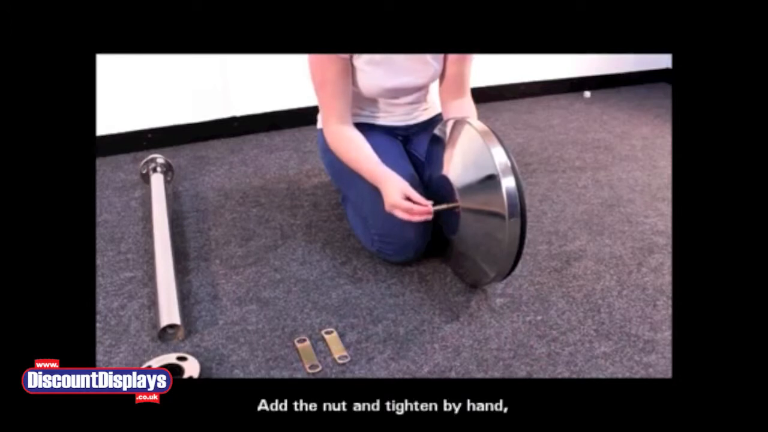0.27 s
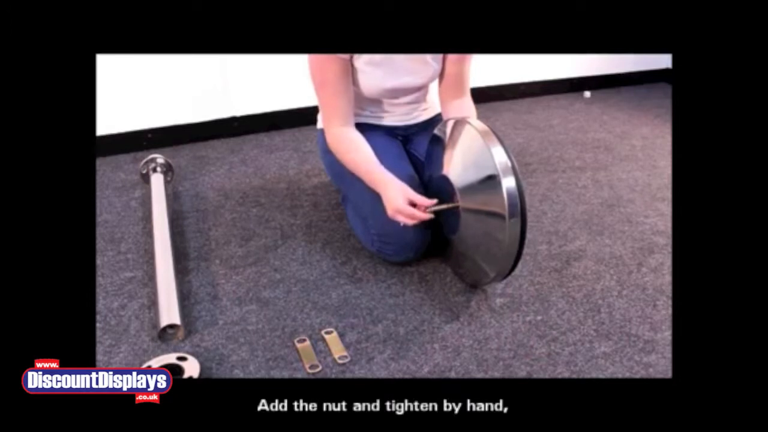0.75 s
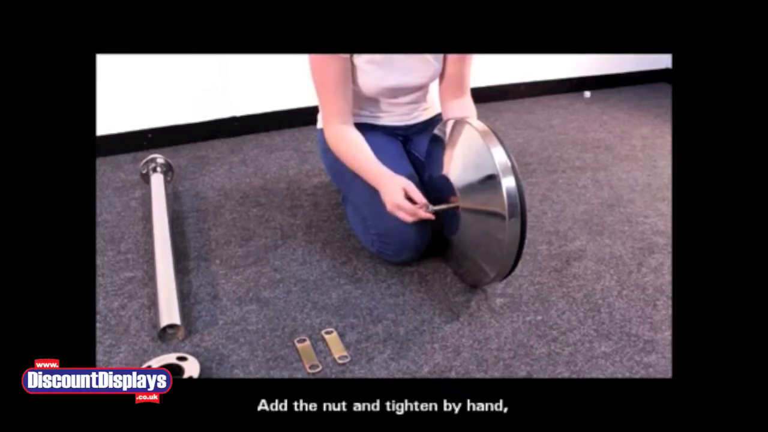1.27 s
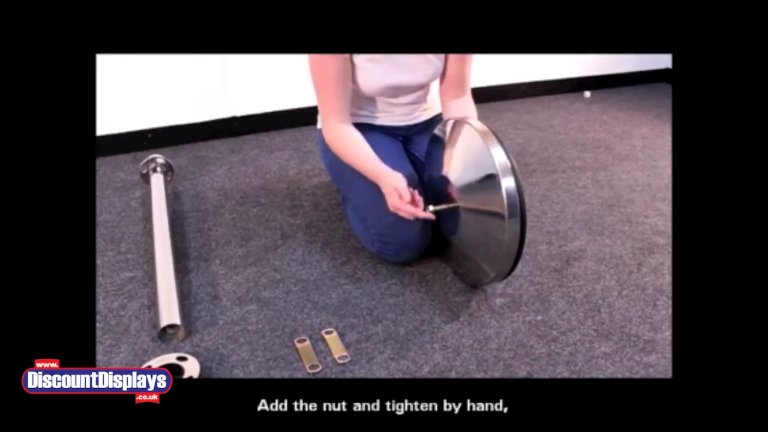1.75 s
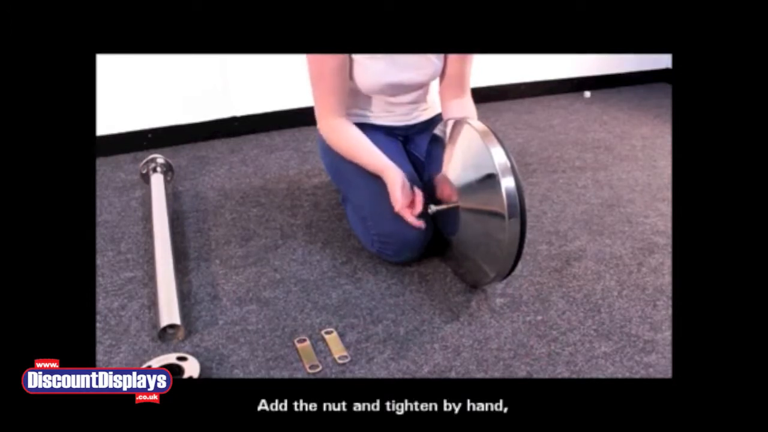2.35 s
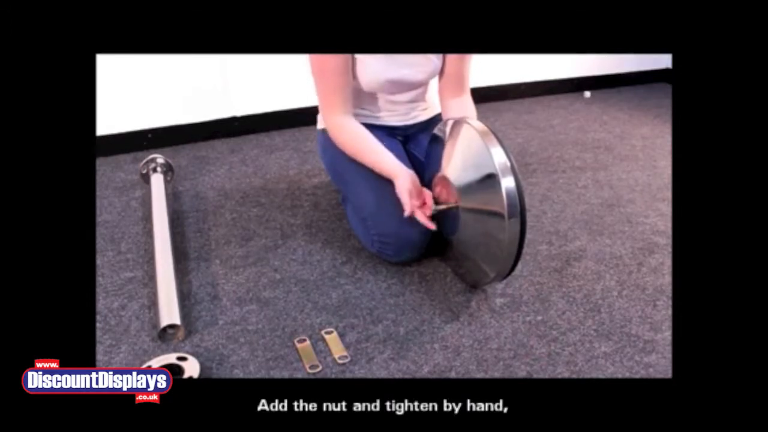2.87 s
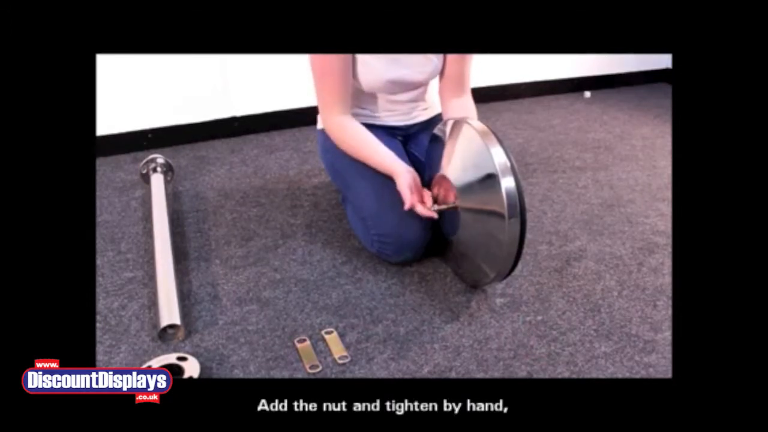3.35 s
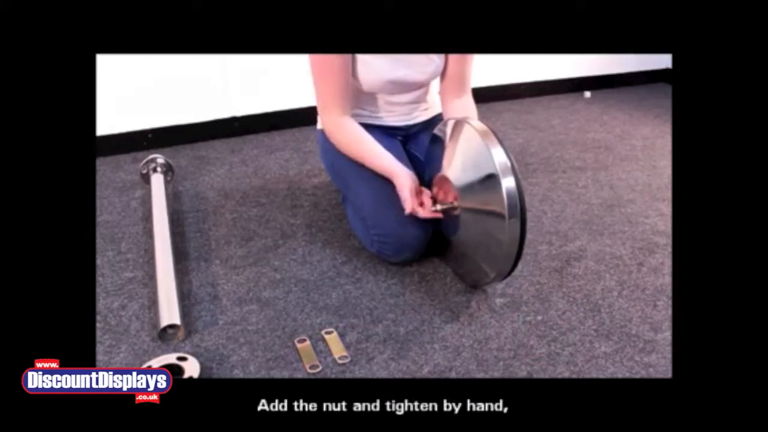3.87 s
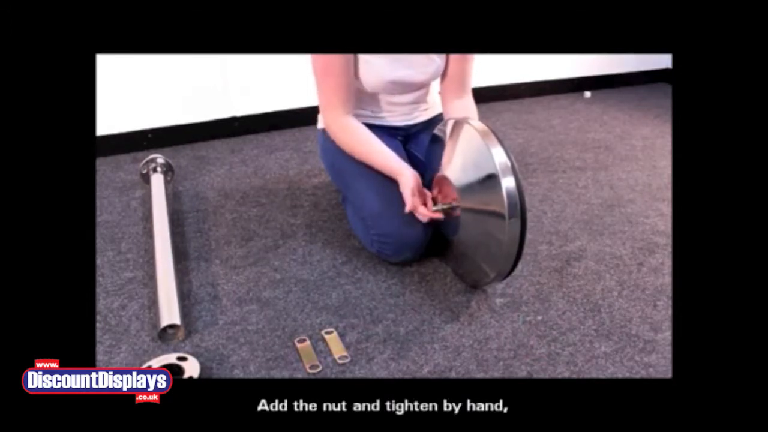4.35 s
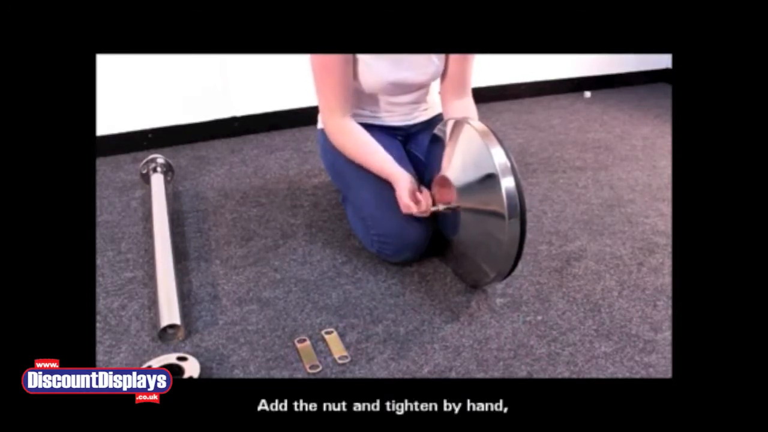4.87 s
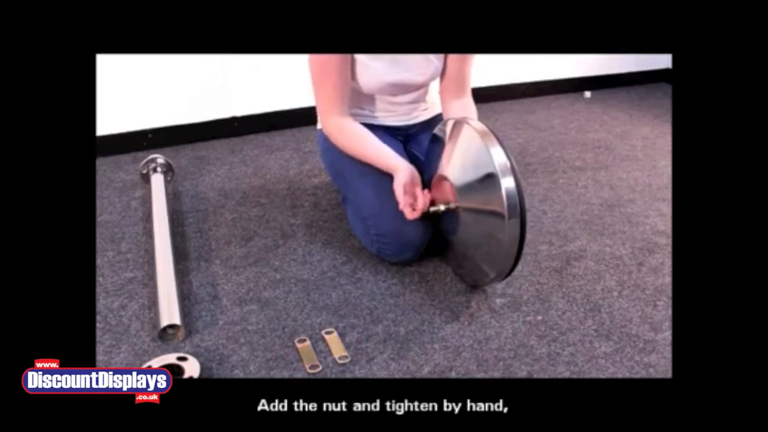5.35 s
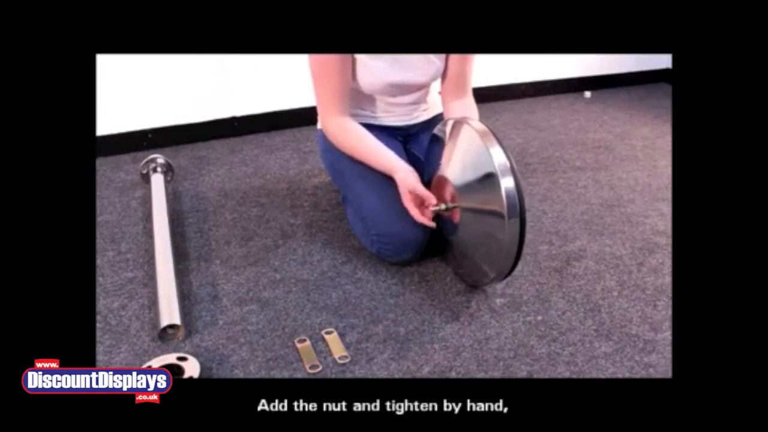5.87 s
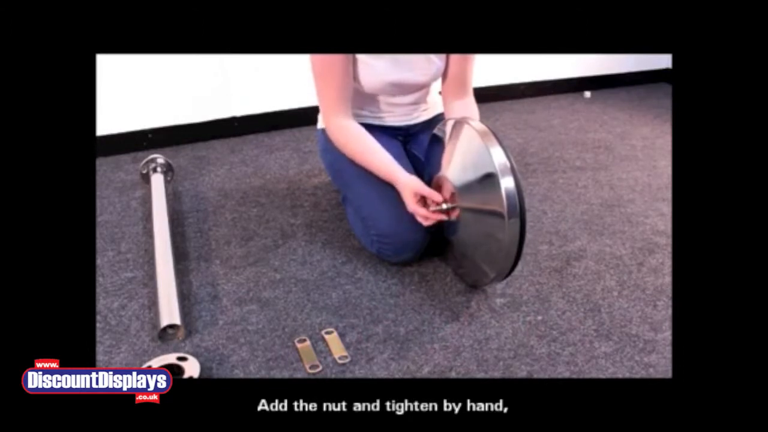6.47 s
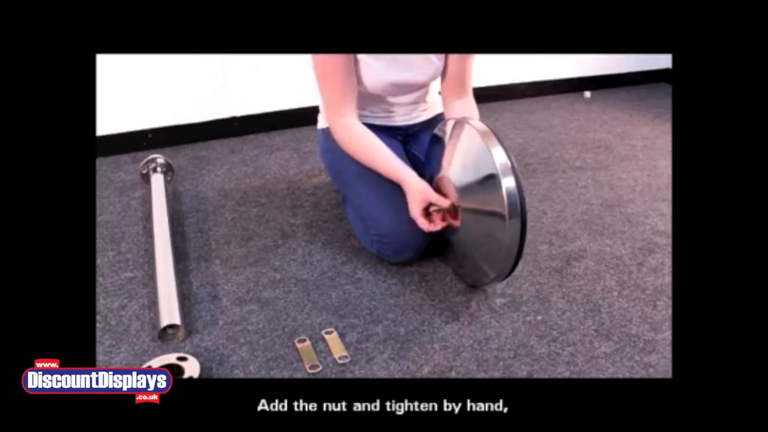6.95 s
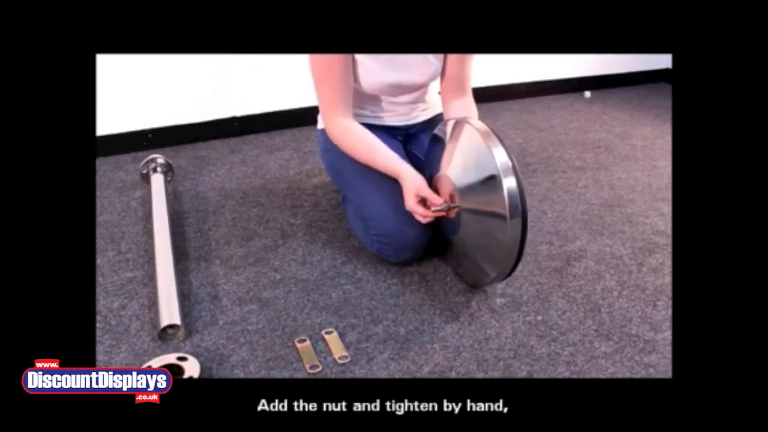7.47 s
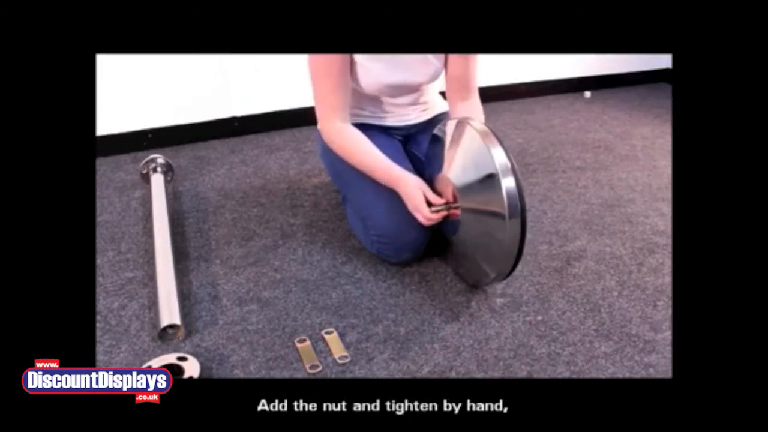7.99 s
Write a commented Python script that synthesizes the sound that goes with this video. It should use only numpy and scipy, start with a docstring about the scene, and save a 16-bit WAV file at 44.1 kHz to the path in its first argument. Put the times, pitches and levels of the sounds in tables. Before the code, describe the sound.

Close metallic taps, scrapes and twelve short rattling spins of a loose steel nut on a bolt, over steady ventilation hum in a carpeted room.

```python
"""Close in mono on a steel nut on a bolt through a hollow steel base disc, in a carpeted room.
Ventilation, filtered noise with fan tones, hums throughout. At first the nut only knocks and scrapes.
From 1.4 s come twelve flicks: a finger taps the nut, grips it and slips off, and the nut coasts, rattling
in its loose thread. Contact forces ring modes of bolt and disc; soft sine thuds are the disc on carpet.
After the last flick at 6.2 s the nut's turns are slow and quiet."""
import sys
import numpy as np
from scipy import signal
from scipy.fft import rfft, irfft
from scipy.io import wavfile
from scipy.ndimage import uniform_filter1d

SR = 44100
rng = np.random.default_rng(int(sys.argv[2]) if len(sys.argv) > 2 else 0)


def wav_out(sig):
    """Save sig, one row per channel (or a flat mono array), as 16-bit PCM at SR to the path in sys.argv[1]."""
    wavfile.write(sys.argv[1], SR, np.round(np.clip(np.atleast_2d(sig).T, -1, 1) * 32767).astype(np.int16))


N = 362502
TIME = np.arange(N) / SR
CLOCK = np.arange(0, N / SR + .001, .001)   # slow clock for level curves, t/s

# ventilation rush, relative spectrum: f/Hz, level/dB
AIR_SPECTRUM = [(15, -42.5), (25, -5), (103, -7), (166, -12.5), (230, -9.5), (268, -12.5), (345, -8.5),
                (372, -9.5), (455, -9.5), (491, -22.5), (543, -12), (834, -18.5), (995, -19), (1100, -20.5),
                (10400, -36), (13500, -95), (22000, -120)]
# fan tones: f/Hz, mean peak level/dB
FAN_TONES = [(100, -69), (302, -64.5), (349, -61), (399, -70), (453, -69)]
# single knocks of nut on thread: t/s, relative level/dB, then shares/dB: dull, bright, top
NUT_KNOCKS = [(0.0534, -24.5, -12.5, -11.5, -49), (0.3151, -22.5, -4, -2, -22.5),
              (0.5307, -52, -1, -17, -28), (0.5756, -34.5, -1, -7.5, -30), (0.7602, -34, -8, -21, -32),
              (0.8674, -36, 3, -4, -28), (0.967, -31.5, 0, 4.5, -13), (1.1328, -32.5, -6.5, -12, -34),
              (1.3315, -31, -6, -22, -36), (3.1836, -16.5, -22, -26, -29), (3.983, -15, -14, -16, -26),
              (5.3202, -15, -22, -14, -21), (6.1328, -44.5, 2, -3, -27), (6.6036, -32.5, -22, -10, -34),
              (6.8249, -31, 0.5, -7.5, -15), (7.659, -49.5, 0, -7, -17), (7.7397, -37.5, -2, -10, -15),
              (7.8483, -47.5, -2, 9, 2), (8.0293, -50, -8, -7, -16), (8.182, -47.5, -6, -1, -24)]
# modes of the disc with its bolt: f/Hz, undamped width/Hz, relative level/dB
DISC_MODES = [(493.8, 11, -14.5), (689, 9.6, -6), (743, 28, -8.5), (802, 6.2, -11.5), (883, 22, -7),
              (984, 25, -7.5), (1085, 38, -13), (1310.5, 38, -7.5), (1446, 38, -11), (1560, 48, -2),
              (1664, 19, 3), (1891, 50, -3.5), (2066, 67, 0), (2344, 81, -3.5), (2404, 46, -29.5),
              (2524, 44, 0.5), (3002, 56, -4), (3172, 23.5, -3.5), (3497, 21.6, -1), (3790, 43, -10),
              (3880, 14, -0.5), (4196, 37, -17.5), (4000, 22, -35), (4670, 230, -7.5), (4790, 36, -14.5),
              (5066, 15, -4), (5185, 51, -11.5), (5420, 49, -11), (8700, 45, -20.5), (9840, 130, -20.5)]
# crowd of weaker modes between them: f/Hz, relative level/dB
WEAK_MODES = [(150, -47), (300, -33), (520, -20), (800, -17), (1800, -26.5), (2450, -22.5), (2800, -47),
              (3400, -14), (4600, -14.5), (5400, -49.5), (5800, -30), (8300, -33.5), (9200, -28),
              (10500, -75)]
# round trips of bending waves across the disc: t/s
BENDING_TRIPS = [.00029, .00067, .00121, .00263]
# borders of the registers body, rub, ring, bright and top: f/Hz
REGISTER_EDGES = [1020, 1480, 2810, 5750]
# ring time of the room: f/Hz, t60/s
ROOM_DECAY = [(300, 0.64), (800, 0.35), (2000, 0.29), (5000, 0.31), (10000, 0.17)]
# the sliding nut makes the bolt sing: t/s, length/s, relative levels/dB of lower and upper mode,
#   fading of the lower mode/(dB per s)
BOLT_SINGING = [(0.054, .06, -59, -33.5, 222), (0.535, .04, -49.5, -76, 80), (1.92, 0.09, -37, -33.5, 99),
                (2.248, .2, -43.5, -34.5, 32), (2.547, .02, -62, -34, 248),
                (2.649, 0.13, -31.5, -32.5, 118), (3.065, 0.22, -37.5, -31, 51),
                (3.515, 0.068, -52, -36, 9), (3.609, 0.41, -36, -27.5, 106), (4.027, .07, -53, -20.5, 200),
                (4.441, 0.0145, -60, -27.5, 250), (4.512, .04, -57, -27, 300), (4.894, .08, -52, -39, 159),
                (5.339, .07, -63, -23, 240), (5.692, .3, -41.5, -62, 2), (6.142, .025, -51, -68, 100)]
# the two singing modes: f/Hz, width/Hz
SINGING_MODES = [(1684, 12), (2535, 55)]
# the nut scrapes along the thread, turned slowly or catching as it coasts: t/s, length/s,
#   relative level/dB, then shares/dB: body, rub, bright, top
THREAD_SCRAPES = [ (0.093, 0.072, -43.5, -10, -2, -12, -35), (0.180, 0.05, -55.5, 6.5, 2.5, -12, -25),
                  (0.529, 0.0083, -51.5, 3, 7.5, -12, -24), (0.573, 0.018, -54, -5, 3.5, -13, -28),
                  (0.638, 0.047, -63, 11.5, 13, -6, -20), (0.731, 0.064, -59, 7, 13.5, -6, -20),
                  (0.818, .07, -52, 0.5, 6, -10, -22), (0.967, 0.014, -48, 5, 1, 1, -29),
                  (1.15, 0.022, -57, 0, 3, -7, -22), (1.191, 0.036, -61, 3, 11.5, -3, -20),
                  (1.323, 0.02, -46.5, 0.5, 9.5, -5.5, -31), (1.35, 0.026, -63.5, 14, -1, -11, -20),
                  (2.267, 0.014, -37.5, -1, -1, -1.5, -16), (2.375, 0.0091, -44, -13, -10, -5.5, -21),
                  (3.595, 0.031, -33.5, -18, -15, -4, -18), (4.929, 0.014, -32.5, -8, -14, -14, -21),
                  (5.861, 0.015, -34.5, -6.5, -8, -6.5, -26), (5.928, 0.011, -36, 0.5, -6, -3.5, -17),
                  (6.606, .022, -51.5, -0.5, -3, -12, -30), (6.742, 0.053, -49, -8, -1.5, -15, -30),
                  (6.81, 0.058, -46.5, 4, 0.5, -12, -28), (7.003, 0.088, -61.5, 3.5, 0, -4.5, -20),
                  (7.115, 0.13, -67.5, 4, 2.5, -7, -14), (7.744, 0.077, -60, 7.5, -19, -7, -13),
                  (7.84, 0.007, -60, 11, 6, -2, -6)]
# soft bumps of the disc on the carpet: t/s, relative level/dB, mean f/Hz, Gaussian spread/s
CARPET_BUMPS = [(0.942, -48.5, 98.6, 0.023), (2.382, -51, 108, 0.015), (2.483, -47, 105, 0.089),
                (5.575, -39.5, 105, 0.025), (5.697, -51.5, 94.9, 0.083), (6.047, -48, 96.2, 0.043),
                (6.407, -49, 59, 0.015), (6.515, -52.5, 74.7, 0.048)]
# finger flicks that spin the nut: touch t/s, slip-off t/s, coast length/s, then relative levels/dB:
#   tap, fingernail edge of the tap, grip, roll, snap, spin-up; then spin-up rise/s, brightness/dB,
#   coast level/dB, slowing/(dB per s; below zero the level grows)
FINGER_FLICKS = [ (1.444, 1.571, 0.039, -37, -10, -49, -40, -29, -31, 0.047, -2.5, -43.5, 62),
                 (1.824, 1.888, 0.13, -34.5, 7, -42.5, -33.5, -24, -36, 0.051, 6.5, -31, 81),
                 (2.18, 2.244, 0.21, -22.5, 8, -37.5, -35, -15.5, -37, 0.032, 3, -39.5, -6),
                 (2.545, 2.646, 0.095, -15.5, 0.5, -44.5, -26, -36, -26, 0.058, 0.5, -35, 24),
                 (3.004, 3.072, 0.26, -15.5, 11.5, -36, -27.5, -14, -25.5, 0.026, -1.5, -32.5, 47),
                 (3.453, 3.51, 0.23, -35.5, -8, -52, -28.5, -19, -30, 0.036, -1, -36, 6),
                 (3.927, 4.029, 0.021, -31, -7, -47, -26, -40, -22.5, 0.062, 1, -38, 118),
                 (4.434, 4.5, 0.016, -16.5, 3.5, -38.5, -31, -10, -22, 0.013, 1, -23.5, 100),
                 (4.846, 4.898, 0.14, -24.5, 5.5, -43.5, -31.5, -14, -30.5, 0.044, -3.5, -31, 118),
                 (5.247, 5.337, 0.022, -16, 13.5, -40, -33, -13, -20, 0.014, 1.5, -34, 100),
                 (5.659, 5.74, 0.24, -16.5, 10.5, -40.5, -36, -12, -30.5, 0.0096, 1.5, -38.5, 19),
                 (6.211, 6.299, 0.045, -34, -11, -39, -39, -25, -38, 0.087, -1, -42.5, 80), ]
# colour of each phase of a flick against its ring level: body/dB, rub/dB, bright/dB, top/dB
TAP_SHARES = (-8.5, -7.5, -7.5, -21)
GRIP_SHARES = (-3.5, -0.5, -9.5, -17.5)
SPIN_SHARES = (-6.5, -19.5, -5.5, -16)
COAST_SHARES = (-1.5, -7.5, -9, -20)
SNAP_SHARES = (-12, -9, -15.5, -26)
# heavy jolts that shake the whole disc: t/s, relative level/dB, centre of the push f/Hz
DISC_JOLTS = [(4.031, -32, 550), (4.504, -34, 486), (5.34, -31.5, 363), (5.347, -34, 675)]
# deep modes of the disc: f/Hz, relative level/dB, t60/s
DEEP_DISC_MODES = [(328, -2, 0.11), (372, 2, .11), (440, 4, 0.12), (500, -3.5, 0.3), (522, -6.5, 0.4),
                   (644, -5.5, 0.84)]

ATTACK_S, RELEASE_S = 0.0089, 0.047   # time in which a rattle rises or falls by 20 dB
BITE_DB, BITE_S = 2.5, 0.0053   # a scrape bites harder as it breaks loose
SCRAPE_RELEASE_S = 0.048   # time in which a scrape falls by 20 dB
ROLL_LEAD_S, ROLL_RISE_S = 0.011, 0.062   # the fingertip rolls over the nut just before it slips off
SPIN_UP_HOLD_S = 0.0084   # the nut keeps its top speed this long
SPIN_DOWN_S, SPIN_DOWN_SHARE = 0.013, 0.82   # the spin-up falls in this time plus a share of its rise
UPPER_FADES = 1.62   # how much faster the upper singing mode fades


def from_db(db):
    """Decibels to gain."""
    return 10 ** (np.asarray(db) / 20)


def unit_energy(x):
    """Scale so that the squares sum to one."""
    return x / np.sqrt(np.sum(x ** 2) + 1e-20)


def at_hz(points, hz):
    """Read a table on a log-frequency axis."""
    f, value = np.transpose(points)
    return np.interp(np.log(np.maximum(hz, 1)), np.log(f), value)


def at_samples(curve):
    """Read a curve of the slow clock at every sample."""
    return np.interp(TIME, CLOCK, curve)


def cut(x, hz, kind, order=4):
    """Causal Butterworth filter."""
    return signal.sosfilt(signal.butter(order, hz, kind, fs=SR, output="sos"), x)


def drift(per_s):
    """Random wander about zero: normal values joined by straight lines, per_s of them a second."""
    knots = rng.standard_normal(N // 20)
    return np.interp(TIME * per_s, np.arange(len(knots)), knots)


def coloured(spectrum, size):
    """Noise of rms 1 with the given spectrum and random phases."""
    hz = np.fft.rfftfreq(size, 1 / SR)
    phases = np.exp(2j * np.pi * rng.random(len(hz)))
    noise = irfft(from_db(at_hz(spectrum, hz)) * phases, size)
    return unit_energy(noise) * np.sqrt(size)


def ventilation(air_db=-56, unsteady=0.4, lowest_hz=34):
    """Steady rush behind the disc, with fan tones that waver in phase and strength."""
    tones = np.zeros(N)
    for hz, db in FAN_TONES:
        tone = np.sin(2 * np.pi * hz * TIME + unsteady * drift(23))
        tones += from_db(db) * tone * (1 + unsteady * drift(12))
    rush = from_db(air_db) * coloured(AIR_SPECTRUM, size=N)
    return cut(rush, lowest_hz, "high", order=1) + tones


def knocks(level_db=13.5, bounce=0.41, bounce_s=.0045):
    """Forces of single knocks and of each flick's tap and snap, each with two fading rebounds."""
    blows = [(s, db, (dull, dull, bright, top)) for s, db, dull, bright, top in NUT_KNOCKS]
    for touch, slip, _, tap_db, nail_db, _, _, snap_db, *_ in FINGER_FLICKS:
        blows.append((touch, tap_db, np.add(TAP_SHARES, [0, 0, 0, nail_db])))
        blows.append((slip, snap_db, SNAP_SHARES))
    force = np.zeros((5, N))
    all_gaps = rng.uniform(0.54, 1.1, (len(blows), 2))
    for (s, db, (body, rub, bright, top)), gaps in zip(blows, all_gaps):
        blow = from_db(db + level_db + np.array([body, rub, 0, bright, top]))
        for k, delay in enumerate([0, *np.cumsum(gaps * bounce_s)]):
            force[:, min(round((s + delay) * SR), N - 1)] += bounce ** k * blow
    return force


def disc_response(damping=0.97, reflection=0.71):
    """Ring of the steel after one contact: strong modes over weak ones, smeared by trips across the disc."""
    size = SR // 2
    hz = np.fft.rfftfreq(size, 1 / SR)
    power = from_db(at_hz(WEAK_MODES, hz)) ** 2
    for centre, width, db in DISC_MODES:
        detuning = 2 * (hz - centre) / (width * damping)
        resonance = from_db(db) ** 2 / (1 + detuning ** 2)
        power = power + resonance / (1 + (detuning / 10) ** 2)   # far skirts of neighbours cancel
    cepstrum = irfft(np.log(power) / 2, size)
    spectrum = np.exp(rfft(2 * cepstrum[:size // 2], size))   # minimum phase: nothing sounds before the contact
    for trip in BENDING_TRIPS:
        delay = np.exp(-2j * np.pi * hz * round(trip * SR) / SR)
        spectrum = spectrum * (delay - reflection) / (1 - reflection * delay)   # all-pass: smears, keeps levels
    return irfft(spectrum, size)


def registers(response):
    """Body, rub, ring, bright and top parts: soft contacts stir the first, hard ones the last."""
    edges = REGISTER_EDGES
    middle = [cut(response, band, "band", order=5) for band in zip(edges, edges[1:])]
    body = cut(response, edges[0], "low", order=6)
    top = cut(response, edges[-1], "high", order=10)
    return [unit_energy(part) for part in [body, *middle, top]]


def room(x, wet_db=-12.0, build_s=0.002):
    """Direct sound plus a weaker diffuse tail that builds up quickly, each band decaying at its own rate."""
    t, tail = TIME[:SR], 0
    edges = np.geomspace(100, 12800, 8)
    for low, high in zip(edges, edges[1:]):
        band = cut(rng.standard_normal(len(t)), [low, high], "band", order=2)
        t60 = at_hz(ROOM_DECAY, np.sqrt(low * high))
        tail = tail + band * from_db(-60 * t / t60)
    tail = unit_energy(tail * (1 - np.exp(-t / build_s)))
    return x + from_db(wet_db) * signal.fftconvolve(x, tail)[:N]


def swell(start, attack_s, hold_s, release_s, fade_db_per_s=0):
    """Attack, fading hold and release, in dB on the slow clock; the ramps are times for 20 dB."""
    t = CLOCK - start
    ramps = np.maximum(-t, 0) / attack_s + np.maximum(t - hold_s, 0) / release_s
    return np.maximum(-20 * ramps - fade_db_per_s * np.clip(t, 0, hold_s), -200)


def singing(level_db=1.0, evening_s=0.16, attack_s=.006, release_s=.07):
    """Steady feeding by the sliding nut holds two narrow bolt modes at an almost even strength."""
    out = np.zeros(N)
    for k, ((hz, width), fades) in enumerate(zip(SINGING_MODES, (1, UPPER_FADES))):
        r = np.exp(-np.pi * width / SR)
        resonator = [1, -2 * r * np.cos(2 * np.pi * hz / SR), r * r]
        tone = signal.lfilter([1, 0, -1], resonator, rng.standard_normal(N))
        tone = cut(tone, [hz - 3 * width, hz + 3 * width], "band", order=2)
        tone /= np.sqrt(uniform_filter1d(tone ** 2, size=int(evening_s * SR)))
        gain = np.zeros(len(CLOCK))
        for s, length, *levels, fading in BOLT_SINGING:
            shape = swell(s, attack_s, length, release_s, fading * fades)
            gain += from_db(levels[k] + level_db + shape)
        out += tone * at_samples(gain)
    return out


def contact_power(db, colour, brighter_db=0, hardening=0.66, firm_db=-27):
    """Power in the five registers; harder contacts are shorter, so richer at the top."""
    body, rub, bright, top = colour
    top = top + brighter_db + hardening * (db + brighter_db - firm_db)
    return from_db([db + body, db + rub, db, db + bright + brighter_db, db + top]) ** 2


def scrape_power():
    """Power of the scrapes along the thread: each swells, bites as it breaks loose, and ends."""
    power = np.zeros((5, len(CLOCK)))
    for s, length, db, *colour in THREAD_SCRAPES:
        bite = BITE_DB * np.exp(-np.maximum(CLOCK - s, 0) / BITE_S)
        level = db + bite + swell(s, ATTACK_S, length, SCRAPE_RELEASE_S)
        power += contact_power(level, colour, hardening=0)
    return power


def rattle(power, per_s=700, uneven_db=6.5, lead_s=0.0039, level_db=-1.0, variety=0.65):
    """Contact forces of the turning nut, one row a register: dense uneven ticks under each stroke."""
    hits = (rng.random(N) < per_s / SR) * rng.choice([-1, 1], N)
    ticks = hits * from_db(uneven_db * np.clip(rng.standard_normal(N), -2, 2))
    ticks = ticks * (1 + variety * rng.standard_normal((5, N)))   # every contact point has its own colour
    ticks /= np.sqrt(uniform_filter1d(ticks ** 2, size=600) + 1e-6)   # the ticks share out the power of the spin
    wobble_db = 1.0 * drift(80)   # the loose nut presses unevenly
    force = []
    for row in np.sqrt(power):
        shifting_db = 1.75 * drift(45)   # its colour shifts as it turns
        force.append(np.interp(TIME + lead_s, CLOCK, row) * from_db(wobble_db + shifting_db))
    return from_db(level_db) * np.array(force) * ticks


def bumps(wander=0.152, lumpy=0.99):
    """Low, padded, lumpy thuds as the disc rocks on the carpet: wavering sines under Gaussian swells."""
    out = np.zeros(N)
    waver = 1 + wander * drift(90)
    for s, db, hz, spread in CARPET_BUMPS:
        thud = np.sin(2 * np.pi * np.cumsum(hz * waver) / SR)
        out += from_db(db) * np.exp(-.5 * ((TIME - s) / spread) ** 2) * thud
    return out * (1 + lumpy * drift(67))


def flick_power():
    """The finger grips the nut, rolls over it and slips off; the nut spins up and coasts to a stop."""
    power = np.zeros((5, len(CLOCK)))
    for (touch, slip, coast_s, _, _, grip_db, roll_db, _, spin_db, rise_s,
         bright_db, coast_db, slowing) in FINGER_FLICKS:
        fall_s = SPIN_DOWN_S + SPIN_DOWN_SHARE * rise_s
        grip = grip_db + swell(touch + ATTACK_S, ATTACK_S, slip - touch, ATTACK_S)
        roll = roll_db + swell(slip - ROLL_LEAD_S, ROLL_RISE_S, 0, ROLL_RISE_S)
        spin = spin_db + swell(slip, rise_s, SPIN_UP_HOLD_S, fall_s)
        coast = coast_db + swell(slip, ATTACK_S, coast_s, RELEASE_S, slowing)
        stroke = contact_power(grip, GRIP_SHARES)
        stroke += contact_power(spin, SPIN_SHARES, bright_db)
        stroke += contact_power(coast, COAST_SHARES)
        stroke[1] += from_db(roll) ** 2   # the soft fingertip stirs only the rub register
        power += stroke * (CLOCK >= touch)
    return power


def jolts(reach_octaves=0.26):
    """The hardest flicks ring the disc's deep modes, most of all those near the centre of the push."""
    out, t = np.zeros(N), TIME[:SR]
    for s, db, centre in DISC_JOLTS:
        at = round(s * SR)
        for hz, mode_db, t60 in DEEP_DISC_MODES:
            push = np.exp(-.5 * (np.log2(hz / centre) / reach_octaves) ** 2)
            decay = from_db(db + mode_db - 60 * t / t60)
            out[at:at + SR] += push * decay * np.sin(2 * np.pi * hz * t) * rng.choice([-1, 1])
    return out


def scene(radiating_hz=270):
    """All contacts ring the same steel, too small to radiate bass, heard in the room."""
    forces = knocks() + rattle(scrape_power() + flick_power())
    rings = registers(disc_response())
    steel = sum(signal.oaconvolve(force, ring)[:N] for force, ring in zip(forces, rings))
    steel = cut(steel + singing() + jolts(), radiating_hz, "high", order=2)
    return (ventilation() + room(steel) + bumps())[None]


def record(dry):
    """One microphone channel, its top cut steeply above 10550 Hz."""
    return signal.sosfilt(signal.ellip(10, .2, 70, 10550, fs=SR, output="sos"), dry)


dry = scene()
out = record(dry)
wav_out(out)
```